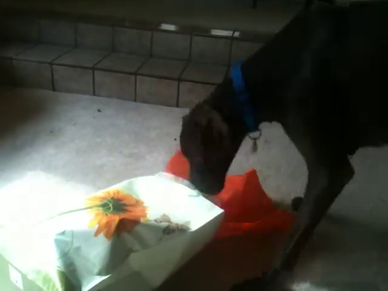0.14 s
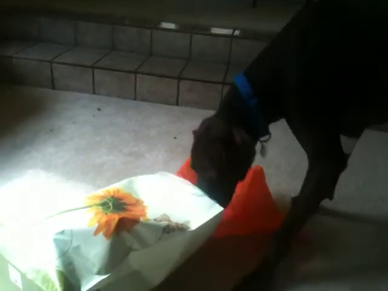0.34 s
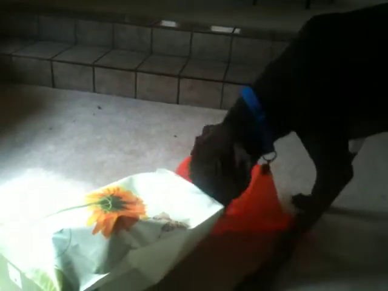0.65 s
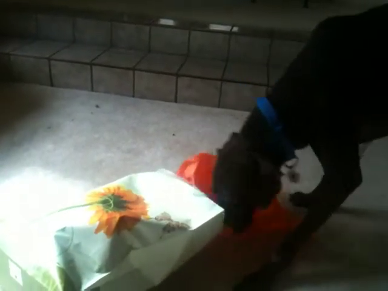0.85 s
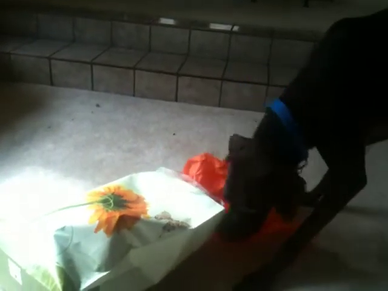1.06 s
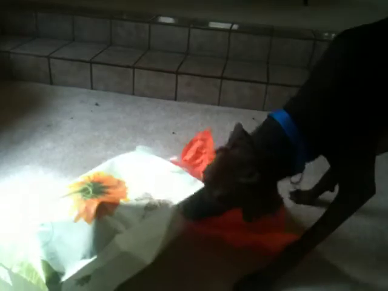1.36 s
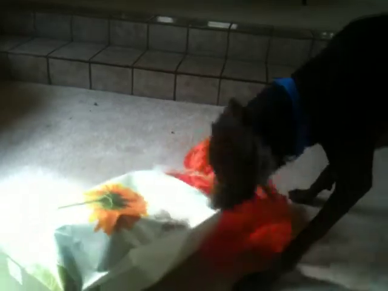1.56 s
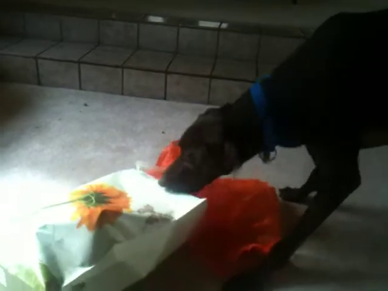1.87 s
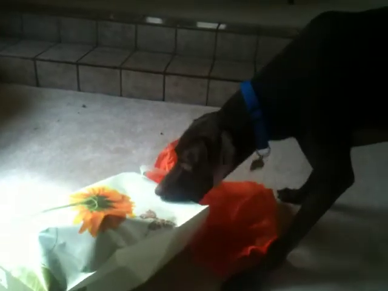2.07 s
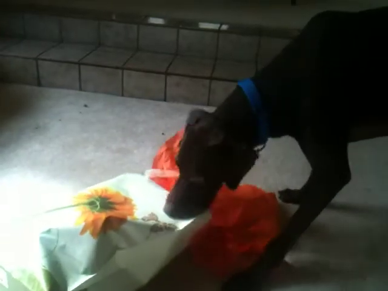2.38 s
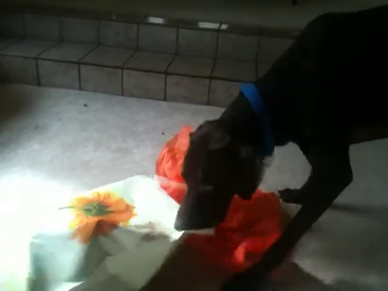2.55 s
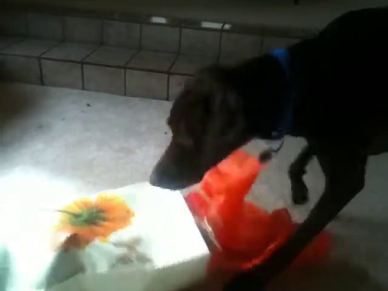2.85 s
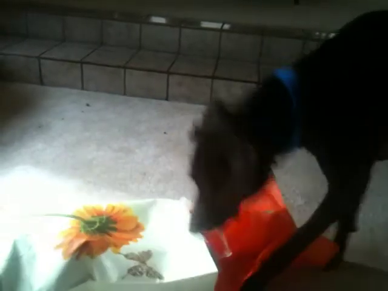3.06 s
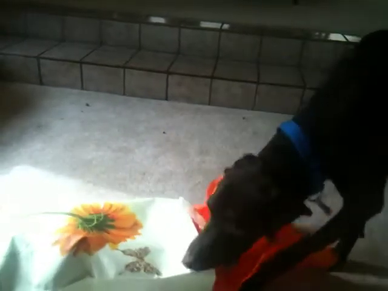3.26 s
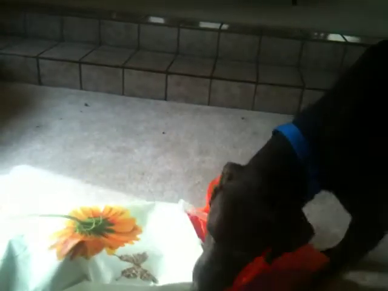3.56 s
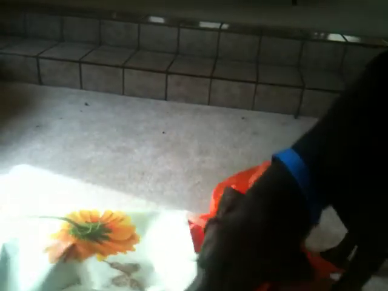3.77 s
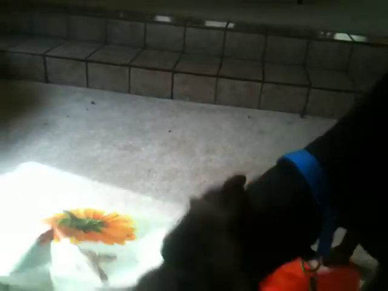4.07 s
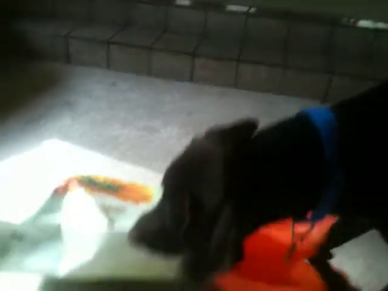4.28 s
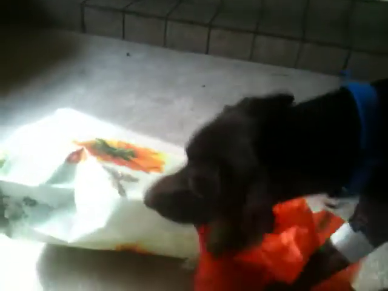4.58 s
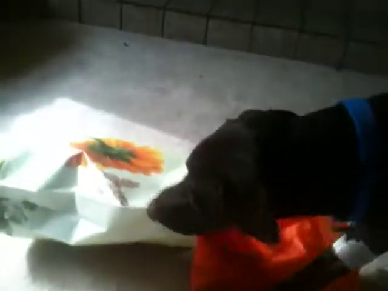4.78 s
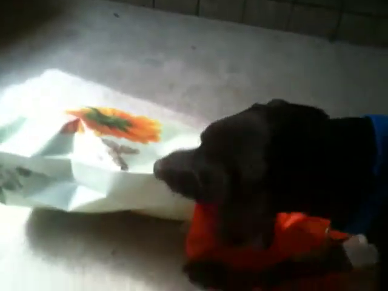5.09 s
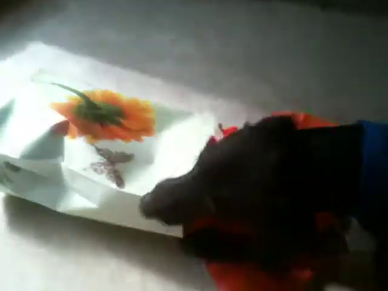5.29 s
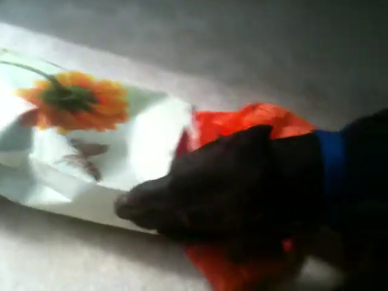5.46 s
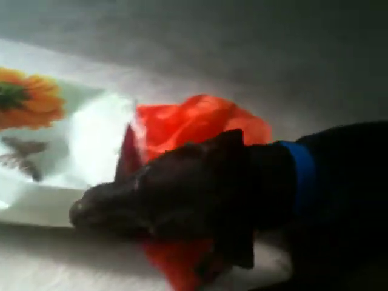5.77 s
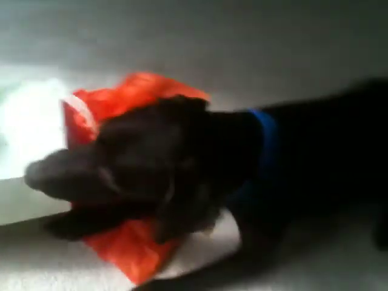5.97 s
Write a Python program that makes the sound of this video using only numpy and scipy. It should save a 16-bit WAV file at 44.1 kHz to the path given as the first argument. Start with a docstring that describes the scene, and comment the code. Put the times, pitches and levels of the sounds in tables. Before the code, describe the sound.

Tissue paper rustles lightly from the start as a dog noses into a stiff paper bag, with one small collar tag clink at 0.3 seconds. Dry, bright crinkles gather from 0.7 seconds, and the bag pops and thumps softly between 1.3 and 1.6 seconds. In a brief lull around 2 seconds, the metal tag clinks a few times. Scraping and rustling swell into a loud snap with a hollow thump at 2.8 seconds. Faint tag ticks follow, then a small hollow knock at 3.4 seconds. The busiest stretch runs from about 4.1 to 4.9 seconds, with sharp bag snaps, low bumps and dense crunching of tissue. Lighter crackling and scraping continue, with another sharp snap near 5.9 seconds. Everything sounds fairly close, in a small room with short reverberation and a faint steady hiss.

```python
"""On the hard floor of a small room, a dog noses into a stiff paper bag stuffed with tissue paper.
The bag's panels buckle with sharp snaps, scrape by stick-slip friction and flex, driving the air
inside as a cavity resonator. The tissue crinkles in swarms of tiny impulses, one for each crease.
Now and then the collar tag strikes its ring and vibrates in its natural modes.
The room adds early reflections and a short reverberation, over a faint steady hiss."""
import sys
import numpy as np
from scipy import signal
from scipy.fft import rfft, irfft, next_fast_len
from scipy.io import wavfile
from scipy.ndimage import map_coordinates

SR = 44100
rng = np.random.default_rng(int(sys.argv[2]) if len(sys.argv) > 2 else 0)


def master_out(mix):
    """Clip the mix to full scale and print it as 16-bit PCM to the path in sys.argv[1]."""
    frames = np.transpose(np.atleast_2d(mix))
    ceiling = np.clip(frames, -1, 1)
    pcm = np.round(ceiling * 32767).astype(np.int16)
    wavfile.write(sys.argv[1], SR, pcm)


N = 270333

FOLD_SLIP_S = 0.016  # decay time of the slip in a small fold
# Panels buckling. Each row: start in seconds, relative level in dB, panel pitch in Hz,
# relative crack level in dB, 60 dB decay time of the slip in seconds.
SNAPS = [(1.3004, -25, 1300, -20, 0.008), (1.3024, -33.5, 2580, -9.5, 0.011),
         (1.357, -46, 2400, -14, 0.032), (1.37, -39.5, 1510, -21, 0.0085), (1.4385, -40, 2350, -5.5, 0.014),
         (1.492, -43.5, 1050, -18, 0.037), (1.511, -34.5, 1210, -28, .011), (1.5798, -37, 1200, -26, 0.015),
         (1.632, -43.5, 2230, -3.5, 0.013), (2.358, -44, 1240, -9, 0.015), (2.544, -39, 1400, -18, 0.05),
         (2.564, -38.5, 1214, -16, 0.028), (2.602, -42.5, 1460, -6, 0.022), (2.733, -38.5, 1700, -6, 0.022),
         (2.7524, -37.5, 1500, 2.5, .004), (2.801, -39, 1150, 2, 0.023), (2.8323, -17.5, 1540, -1, 0.0092),
         (2.842, -28, 1920, -5, 0.028), (2.8479, -24, 2110, -11, 0.0093), (2.86, -31.5, 1290, -23, 0.024),
         (2.877, -38, 2050, -5, 0.039), (2.923, -38.5, 1330, -20, 0.015), (2.937, -39.5, 1200, -27, 0.025),
         (2.994, -48, 1510, -12, 0.019), (3.072, -44, 1400, -19, 0.02), (3.195, -50, 1280, -10, .016),
         (3.207, -48.5, 850, -9, 0.03), (3.6506, -31, 1560, -11.5, 0.0091),
         (3.652, -36.5, 2500, -10, 0.008), (3.682, -40.5, 2330, -4, 0.0091), (3.854, -41, 1540, -12, 0.034),
         (3.873, -33, 1500, -15.5, 0.031), (3.8957, -30.5, 1820, -12.5, 0.012),
         (3.9751, -37.5, 1620, -18, .012), (4.033, -36.5, 1390, 0.5, 0.0077),
         (4.1045, -26.5, 2200, -4, .012), (4.106, -35, 1100, -16, .01), (4.1194, -26, 1630, -9.5, 0.01),
         (4.1272, -29, 2050, -16, 0.014), (4.147, -36, 1260, -10, 0.013), (4.272, -39, 1120, -19, 0.02),
         (4.4146, -19.5, 1720, -8, 0.011), (4.416, -22.5, 2520, -13, 0.009),
         (4.485, -26.5, 2300, -13, 0.011), (4.4877, -24.5, 1330, -12, 0.011),
         (4.4885, -23.5, 2300, -12.5, 0.012), (4.493, -30, 2150, -14, 0.018),
         (4.4965, -29.5, 790, -16, 0.023), (4.757, -39.5, 1890, -4, 0.025), (5.074, -51.5, 1410, 3.5, 0.01),
         (5.182, -40.5, 1270, -22, 0.011), (5.234, -44.5, 1480, -6, 0.02), (5.311, -39, 1420, -13, 0.023),
         (5.325, -35, 1540, -21, 0.019), (5.345, -36.5, 1400, -20, 0.022), (5.353, -42, 1560, 0, 0.0091),
         (5.413, -36, 1330, -36, 0.015), (5.4828, -31, 2360, -6.5, 0.012), (5.509, -37, 1460, -22, 0.032),
         (5.627, -49, 2090, -8, 0.039), (5.651, -44.5, 1146, -18, 0.014),
         (5.794, -34.5, 1400, -15.5, 0.005), (5.8497, -23.5, 1980, -3, 0.0074),
         (5.8509, -31.5, 1490, -16, 0.01), (5.854, -42, 2010, 9, 0.0051), (5.863, -46, 1700, -11, 0.012),
         (6.033, -43, 1470, -8, .028), (6.055, -48, 1200, -17, 0.019)]
def buckles():
    """Elastic instability: each snap settles with a weaker, lower pop, and small folds yield at random."""
    delays = 0.005 * (.5 + rng.random(len(SNAPS)))
    settling = [(s + delay, db - 12.5, hz * 0.541, *crack)
                for (s, db, hz, *crack), delay in zip(SNAPS, delays)]
    folds = [(s, db, hz, -5, FOLD_SLIP_S) for s, db, hz in chance(9, PUSH, over_db=8, hz=1400)]
    return [*SNAPS, *settling, *folds]


# Panel resonances. Each row: frequency in Hz, bandwidth in Hz, gain in dB.
PANEL_MODES = [(810, 52, 0), (1170, 380, 9.5), (1700, 420, -1), (2420, 360, 9), (2480, 410, 1)]
def panel_ring(t, hz, crack_db, slip_s, edge_hz=2900):
    """Modal response: a pop excites nearby panel modes, the fold's own pitch and one overtone."""
    # the bag changes shape, so its panels are never tuned quite alike
    detune = np.exp(.035 * rng.standard_normal(len(PANEL_MODES)))
    modes = [(f * shift, width, gain - 9 * abs(np.log2(f / hz)))
             for (f, width, gain), shift in zip(PANEL_MODES, detune)]
    # a broad panel radiates little treble; a soft buckle is duller still and loses its overtone
    soft_db = max(-11.5 - crack_db, 0)
    fold_modes = [(hz, .19 * hz, 12), (1.504 * hz, .19 * hz, 4.5 - 3 * soft_db)]
    treble_cut = signal.butter(4, edge_hz * 2 ** (-soft_db / 26), fs=SR, output="sos")
    pop = (t == 0) + 0.26 * np.clip(t / 0.0015, 0, 1) * burst(t, slip_s)
    ringing = resonate(pop, modes) * amp(3.5) + resonate(pop, fold_modes) * amp(4.0)
    return fix_energy(signal.sosfilt(treble_cut, ringing))


# Spectrum of a crack. Each row: frequency in Hz, gain in dB.
CRACK_SPECTRUM = [(80, -14), (500, -21), (800, -17), (2200, -20), (2900, 3), (3500, -2), (4200, 5.5),
                  (5300, 4.5), (6300, 2), (8200, -3), (10000, -16), (12000, -19.5), (15800, -46)]
def snaps(rise_s=0.00072, usual_db=-41, thump_hz=330):
    """Snap-through buckling: a fold releases its strain as a crack, a panel ring and a thump of air."""
    out, t = np.zeros(N), np.arange(SR // 8) / SR
    for s, db, hz, crack_db, slip_s in buckles():
        panel = amp(-8.5) * panel_ring(t, hz, crack_db, slip_s)
        flutter = burst(t, slip_s) + 0.049 * burst(t, 0.043)
        skid = 1.4 * (t == 0) + (1 - np.exp(-t / rise_s)) * flutter
        skid = coloured(skid, [(6000, 0), (12000, db + crack_db + 26.5)])  # harder is brighter
        crack = amp(crack_db - 7.5) * fix_energy(coloured(skid, CRACK_SPECTRUM))
        # harder snaps go more into the panel and less into the air
        thump_db = -13.5 - 0.23 * max(db - usual_db, 0)
        thump = (slip_s / FOLD_SLIP_S) ** 0.44 * amp(thump_db) * bump(thump_hz, ring_db=-2.0)
        add(out, s, amp(db + 3.5) * (panel + crack + thump))
    return out


# The muzzle's push on the bag. Each row: time in seconds, relative level in dB.
PUSH = [(0, -60.5), (.5, -63.5), (1.1, -62), (1.35, -56), (1.6, -58.5), (1.76, -74), (1.85, -65.5),
        (2.329, -73.5), (2.48, -60), (2.56, -54.5), (2.82, -48.5), (3.15, -63), (3.42, -70.5),
        (3.52, -62.5), (3.7, -59), (4.15, -52.5), (4.62, -52.5), (5.001, -60.5), (5.38, -54.5),
        (5.63, -62.5), (5.92, -53.5), (6.08, -62)]
# Spectrum of scraping paper. Each row: frequency in Hz, gain in dB.
SCRAPE_SPECTRUM = [(70, -36), (250, -8), (550, 3), (900, 2.5), (1400, 4.5), (1900, 2), (2250, 1.5),
                   (3000, -10), (4500, 5), (9000, -14.5)]
def scraping():
    """Stick-slip friction: small slips excite three paper resonances, louder as the muzzle pushes."""
    modes = [(1070, 240, 0), (1540, 1100, 0.012), (2400, 1000, 0)]
    slips = sum(resonate(crinkles(per_s=260, spread_db=4.5, t60=0.028), [mode]) for mode in modes)
    friction = unit_rms(slips) + rng.standard_normal(N)
    return amp(-2.5) * envelope(PUSH) * unit_rms(coloured(friction, SCRAPE_SPECTRUM))


def flexing(usual_push_db=-59.5, deeper_db_per_s=0.5):
    """Forced vibration: the walls follow the push, and boom more as the muzzle works deeper."""
    drive = crinkles(per_s=120, spread_db=3, t60=0.038) + amp(-7.0) * rng.standard_normal(N)
    depth_db = deeper_db_per_s * np.arange(N) / SR
    push = (envelope(PUSH) / amp(usual_push_db)) ** 0.95
    return amp(-70 + depth_db) * push * unit_rms(hollow(drive))


# Low thumps of the bag, some alone and some under its loud snaps.
# Each row: start in seconds, relative level in dB, pitch in Hz.
LOW_THUMPS = [(0.093, -47, 231), (.926, -47.5, 320), (1.207, -40, 214), (1.302, -37.5, 350),
              (1.359, -40.5, 196), (1.511, -42, 330), (1.581, -38, 362), (1.648, -46.5, 330),
              (1.726, -50, 270), (1.845, -49, 345), (1.87, -51, 260), (1.978, -48, 283), (2.365, -40, 262),
              (2.565, -43, 300), (2.735, -42, 250), (2.767, -44, 200), (2.81, -35, 257),
              (2.827, -27.5, 248), (3.5, -43.5, 169), (3.596, -44, 163), (3.893, -45, 250),
              (3.977, -40, 232), (4.104, -36.5, 300), (4.128, -35, 330), (4.181, -42, 250),
              (4.415, -37.5, 330), (4.485, -31.5, 199), (4.763, -51, 220), (4.787, -51, 250),
              (4.894, -45.5, 298), (5.041, -52, 277), (5.181, -46, 260), (5.207, -41, 270),
              (5.308, -39.5, 262), (5.489, -36.5, 290), (5.761, -48, 280), (5.812, -44.5, 300),
              (5.852, -48, 320), (6.031, -37, 318)]
def low_thumps():
    """Damped resonance: the hollow bag thumps at a low pitch, with a brief rub of paper."""
    out, t = np.zeros(N), np.arange(SR // 8) / SR
    for s, db, hz in LOW_THUMPS:
        rub = resonate(burst(t, 0.11), [(915, 470, 0)])
        add(out, s, amp(db - 3.0) * (bump(hz, ring_db=-2.5) + amp(-9.5) * fix_energy(rub)))
    return out


def bump(hz, ring_db):
    """Piston radiation: a wall gives with one low push, and the cavity answers."""
    t = np.arange(SR // 8) / SR
    band = signal.butter(3, [120, 700], "band", fs=SR, output="sos")
    shove = signal.sosfilt(band, (t == 0) + 0.059 * burst(t, 0.046))
    wall = fix_energy(resonate(shove, [(hz, 0.59 * hz, 0)]))
    cavity = fix_energy(hollow(burst(t, 0.048)))
    return fix_energy(wall + amp(ring_db) * cavity)


# Resonances of the enclosed air and whole walls. Each row: frequency in Hz, bandwidth in Hz, gain in dB.
HOLLOW_MODES = [(144, 120, -9.5), (221.6, 109, -1.5), (270, 92, 1.5), (366, 195, -1), (480, 157, -4.5)]
def hollow(x, low_hz=125):
    """Cavity resonance: the bag booms, but is too small to radiate deep bass."""
    band = signal.butter(3, [low_hz, 800], "band", fs=SR, output="sos")
    return signal.sosfilt(band, resonate(x, HOLLOW_MODES))


# Tone colour of the rustle as heard through the microphone. Each row: frequency in Hz, gain in dB.
RUSTLE_COLOUR = [(600, -33), (1500, 0.5), (2350, -0.5), (3400, -5.5), (4200, -4.5), (5000, -3), (6300, -1),
                 (8200, -3), (9800, -12), (10700, -14.5), (12200, -14.5), (15800, -23)]
def tissue_grain(fits_per_s=70, fits_db=1.6):
    """Crackling noise: folds of three sizes give way, each in its own register, in fits and starts."""
    registers = [(2520, 16000, 0.012), (5300, 5400, 0), (9000, 28000, 0.023)]
    swarms = sum(resonate(crinkles(per_s=620, spread_db=4.2, t60=.005), [mode]) for mode in registers)
    sliding = amp(-10) * rng.standard_normal(N)
    knots = rng.standard_normal(int(N * fits_per_s / SR) + 4)
    fits = map_coordinates(knots, [np.arange(N) * fits_per_s / SR])
    return coloured(amp(fits_db * fits) * (unit_rms(swarms) + sliding), RUSTLE_COLOUR)


# Stirring of the tissue. Each row: time in seconds, relative level in dB.
STIR = [(0, -59.5), (.17, -57.5), (.52, -65.5), (1.05, -61), (1.55, -64.5), (1.77, -71.5), (1.815, -64.5),
        (2.48, -65.5), (2.6, -56), (2.82, -56), (3.05, -60.5), (3.44, -69.5), (3.64, -66), (3.93, -58.5),
        (4.3, -59), (4.5, -49.5), (5.05, -60.5), (5.22, -61.5), (5.36, -56), (5.52, -64), (6.13, -65)]
def stirring():
    """Superposition: countless tiny slips merge into a rustle that swells as the tissue moves."""
    return amp(-0.5) * envelope(STIR) * unit_rms(tissue_grain())


# Crushed wads. Each row: start in seconds, level in dB, time before the decay in seconds,
# treble gain in dB.
CRUSHES = [(0.585, -61.5, .03, -8), (0.735, -54, 0.038, 2), (0.87, -58, .16, 3), (1.138, -59, .19, 0),
           (1.446, -62, .12, 3), (2.22, -63, 0.045, 19), (2.564, -60, 0.18, 6), (3.494, -57, 0.04, 0),
           (3.723, -59.5, .06, -6), (4.327, -49, 0.19, -2.5), (4.548, -44.5, 0.11, -0.5),
           (4.77, -52, 0.11, -2.5), (5.874, -57, 0.11, -7), (5.988, -63, 0.04, 9)]
def crushes():
    """Avalanche: a squeezed wad lets go many creases at once and quickly falls still."""
    out, grain = np.zeros(N), tissue_grain()
    for s, db, hold_s, treble_db in CRUSHES:
        wad = coloured(grain[round(s * SR):][:SR // 6], [(1500, 0.63), (4500, 0.21), (12000, treble_db)])
        t = np.arange(len(wad)) / SR
        squeeze = np.clip(t / 0.0053, 0, 1) * amp(-60 * np.maximum(t - hold_s, 0) / 0.075)
        add(out, s, amp(db) * squeeze * unit_rms(wad))
    return out


# The sharpest tissue creases. Each row: start in seconds, relative level in dB, pitch in Hz.
CREASES = [(0.015, -50, 3980), (.109, -49, 6000), (0.179, -44, 6500), (.554, -52, 6000), (.742, -50, 7000),
           (.748, -47, 7000), (0.7626, -47, 7000), (0.8, -44, 6200), (.856, -45, 7000), (.865, -49, 6500),
           (0.879, -45, 7500), (0.8987, -49, 7500), (.948, -43.5, 6500), (.999, -47, 6500),
           (1.0086, -39, 7000), (1.068, -50, 4200), (1.121, -42, 6200), (1.144, -47, 7500),
           (1.155, -48, 7000), (1.1672, -37.5, 3600), (1.178, -46, 6500), (1.198, -45, 7500),
           (1.239, -42, 5500), (1.243, -47, 8000), (1.262, -43, 4500), (1.272, -47, 6000),
           (1.72, -52, 4000), (2.018, -46.5, 3500), (2.082, -45.5, 5200), (2.189, -66, 5000),
           (2.529, -47, 6000), (2.71, -41, 6000), (2.764, -40, 6500), (2.986, -50, 6500),
           (2.995, -48, 6500), (3.015, -41.5, 8000), (3.088, -49, 8100), (3.182, -50, 6500),
           (3.709, -51, 6300), (4.366, -38, 5500), (4.567, -39, 4500), (4.587, -36, 5000),
           (4.626, -38, 3980), (4.656, -37, 4200), (4.7963, -43, 6200), (4.842, -38, 5500),
           (4.862, -44, 6000), (4.977, -52, 6000), (5.596, -52, 6000), (5.716, -53, 7000),
           (5.96, -46, 6500)]
def creases():
    """Heavy damping: each larger crease gives one dry tick; lesser ones yield at random."""
    out, t = np.zeros(N), np.arange(SR // 25) / SR
    for s, db, hz in CREASES + chance(5.5, STIR, over_db=9, hz=6200):
        tick = coloured(burst(t, t60=0.016), RUSTLE_COLOUR)
        add(out, s, amp(db - 6.0) * fix_energy(resonate(tick, [(hz, 2 * hz, 0)])))
    return out


# Modes of the tag and ring. Each row: frequency in Hz, gain in dB, 60 dB decay time in seconds.
TAG_MODES = [(2740, 4.5, 0.045), (4695, -1, 0.043), (5450, 1, 0.054), (6220, 5, .045), (6640, -1, .04),
             (7300, -2, .05), (7500, -8, .035), (7900, -4, .05), (8400, 0, .04), (8600, 0, .1),
             (11650, -6, .07), (12200, -5, .04), (12870, -7, .06), (14900, 1, .022)]
# The tag striking its ring. Each row: start in seconds, relative level in dB, favoured pitch in Hz,
# gain of the ringing in dB.
CLINKS = [(0.3, -41, 3650, -0.5), (1.893, -41, 6200, -13), (1.935, -35.5, 6200, -16),
          (1.941, -24, 7150, -23), (1.9425, -43, 14000, -7), (1.947, -42, 5500, -9),
          (1.954, -46, 8400, -12), (2.111, -44, 7500, -11), (2.1204, -37.5, 6770, -13.5),
          (2.122, -49, 11300, -7), (2.13, -42, 8400, -11), (3.131, -47, 6200, -7), (3.133, -52, 12200, -9),
          (3.138, -49, 14800, -8), (3.229, -49, 9600, -3.5)]
def tag_clinks(chatter_s=0.0019):
    """Free vibration: metal rings after a double contact; damped by the dog's coat it only ticks."""
    out, t = np.zeros(N), np.arange(SR // 4) / SR
    for s, db, hz, ring_db in CLINKS:
        strike_db = rng.normal(0, 2.5, len(TAG_MODES))
        # still jostling on its ring, the tag never holds a pure tone
        jostle = np.cumsum(rng.normal(0, .07, (len(TAG_MODES), len(t))), axis=1)
        ring = np.zeros(len(t))
        for (f, gain, t60), strike, drift in zip(TAG_MODES, strike_db, jostle):
            mode_db = gain + strike - 31 * abs(np.log2(f / hz))
            ring += amp(mode_db - 60 * t / t60) * np.cos(2 * np.pi * f * t + drift)
        touch = (t == 0) + 0.29 * burst(t, 0.03)
        add(touch, chatter_s, np.array([-0.7]))
        contact = resonate(resonate(touch, [(hz, 0.3 * hz, 0)]), [(hz, 0.73 * hz, 0)])
        add(out, s, amp(db + ring_db) * fix_energy(ring) + amp(db - 14.5) * fix_energy(contact))
    return out


def tag_slide(start_s=1.81, length_s=0.14, hz=6200, width_hz=240):
    """Frictional excitation: sliding on its ring, the tag swells and fades on one mode."""
    out, t = np.zeros(N), np.arange(SR // 4) / SR
    swell = np.sqrt(np.abs(np.sin(np.pi * np.minimum(t / length_s, 1))))
    song = resonate(rng.standard_normal(len(t)), [(hz, width_hz, 0)])
    add(out, start_s, amp(-65.5) * swell * unit_rms(song))
    return out


# Modes of something hollow in the bag. Each row: frequency in Hz, gain in dB, 60 dB decay time in seconds.
KNOCK_MODES = [(734, -7, 0.17), (1200, 11, 0.018), (1330, -18, 0.014)]
def knock(start_s=3.4345):
    """Impulse response: bumped once by the muzzle, a hollow object rings as damped sinusoids."""
    out, t = np.zeros(N), np.arange(SR // 6) / SR
    ring = sum(amp(db - 60 * t / t60) * np.cos(2 * np.pi * hz * t) for hz, db, t60 in KNOCK_MODES)
    attack = np.clip(t / 0.0015, 0, 1)
    add(out, start_s, amp(-44.5) * fix_energy(ring * attack))
    return out


# Narrow resonances of the bag's air. Each row: frequency in Hz, bandwidth in Hz, relative gain in dB.
AIR_MODES = [(202, 8.1, -12), (270, 13, -1), (705, 37, -7), (770, 110, 7), (1780, 110, -30), (2360, 210, 9)]
def bag_air(paper):
    """Sympathetic resonance: the air in the bag rings on after the paper has moved."""
    return amp(-21.5) * sum(resonate(paper, [mode]) for mode in AIR_MODES)


# The room's decay. Each row: frequency in Hz, reverberation time in seconds.
ROOM_DECAY = [(150, 0.52), (1500, 0.17), (5000, 0.27), (14000, 0.18)]
def room(x, wet_db, early_db):
    """Reverberation: nearby hard surfaces reflect within milliseconds, then a diffuse tail decays."""
    out, block = np.zeros(N), SR // 4
    for start in range(0, N, block):  # new random paths for each block, as the dog moves
        hz, t, spectra = signal.stft(rng.standard_normal(SR // 2), SR, nperseg=256)
        decay = amp(-60 * t / log_interp(ROOM_DECAY, hz)[:, None])
        tail = signal.istft(spectra * decay, SR, nperseg=256)[1]
        t = np.arange(len(tail)) / SR
        tail = tail * np.clip(t / 0.0089, 0, 1)
        early = burst(t, 0.11) * (rng.random(len(t)) < .05) * (t > .002)
        response = amp(wet_db) * tail / np.linalg.norm(tail) + amp(early_db) * early / np.linalg.norm(early)
        add(out, start / SR, signal.fftconvolve(x[start:start + block], response))
    return out


# Spectrum of the background. Each row: frequency in Hz, gain in dB.
HISS_SPECTRUM = [(30, -39), (80, -10.5), (150, -3), (300, 3.5), (600, -5), (1200, -6), (2300, -12),
                 (3400, -19), (6300, -34), (11000, -15.5), (15500, -17.5)]
def hiss():
    """Stationary noise: a faint, steady floor under everything."""
    return amp(-70.5) * unit_rms(coloured(rng.standard_normal(N), HISS_SPECTRUM))


def crinkles(per_s, spread_db, t60):
    """Shot noise: slips of random time and size, each with one of 24 brief flutters."""
    size = amp(spread_db * np.minimum(rng.exponential(size=N), 3))
    slips = size * rng.choice([-1, 1], N) * (rng.random(N) < per_s / SR)
    t = np.arange(SR // 50) / SR
    flutter = rng.integers(0, 24, N)
    return unit_rms(sum(signal.oaconvolve(slips * (flutter == k), fix_energy(burst(t, t60)))[:N]
                        for k in np.unique(flutter)))


def chance(per_s, curve, over_db, hz, scatter_db=3, scatter_octaves=0.095):
    """Poisson process: (seconds, dB, Hz) events whose strength follows a level curve."""
    draws = rng.random((200, 3))
    times = np.cumsum(-np.log(1 - draws[:, 0])) / per_s
    db = np.interp(times, *np.transpose(curve)) + over_db + scatter_db * (2 * draws[:, 1] - 1)
    pitch = hz * 2 ** (scatter_octaves * (2 * draws[:, 2] - 1))
    return [event for event in zip(times, db, pitch) if event[0] < N / SR]


def burst(t, t60):
    """Exponential decay: white noise that falls 60 dB in t60 seconds."""
    return rng.standard_normal(len(t)) * amp(-60 * t / t60)


def resonate(x, modes):
    """Modal sum: x drives (Hz, bandwidth in Hz, dB) resonators of alternating sign."""
    size = next_fast_len(len(x) + 4096)
    f = np.fft.rfftfreq(size, 1 / SR)
    response = sum((-1) ** k * amp(db) * 1j * f * width / (hz * hz - f * f + 1j * f * width)
                   for k, (hz, width, db) in enumerate(modes))
    return irfft(rfft(x, size) * response, size)[:len(x)]


def coloured(x, spectrum):
    """Minimum-phase filtering: x is shaped causally by a (Hz, dB) spectrum."""
    size = 2 * next_fast_len(len(x) // 2 + 1024)
    cepstrum = irfft(np.log(amp(log_interp(spectrum, np.fft.rfftfreq(size, 1 / SR)))))
    cepstrum[1:size // 2] *= 2
    cepstrum[size // 2 + 1:] = 0
    return irfft(rfft(x, size) * np.exp(rfft(cepstrum)))[:len(x)]


def log_interp(points, hz):
    """Interpolation of (Hz, value) points on a logarithmic frequency axis."""
    f, values = np.transpose(points)
    return np.interp(np.log(hz + 1), np.log(f + 1), values)


def envelope(curve):
    """Amplitude envelope: a (seconds, dB) curve as one gain per sample."""
    return amp(np.interp(np.arange(N) / SR, *np.transpose(curve)))


def amp(db):
    """Decibels as an amplitude ratio."""
    return 10 ** (np.asarray(db) / 20)


def unit_rms(x):
    """Power normalisation to rms 1."""
    return x / np.sqrt(np.mean(x ** 2) + 1e-20)


def fix_energy(x):
    """Energy normalisation: a short sound gets the energy of 2 ms at rms 1."""
    return x * np.sqrt(.002 * SR / (np.sum(x ** 2) + 1e-20))


def add(track, s, x):
    """Superposition of x on the track from s seconds."""
    part = track[max(round(s * SR), 0):][:len(x)]
    part += x[:len(part)]


def scene():
    """Linear superposition: direct sound of paper and collar, its reflections and the hiss."""
    paper = scraping() + flexing() + stirring() + crushes() + low_thumps() + snaps() + creases()
    direct = paper + bag_air(paper) + knock() + tag_clinks() + tag_slide()
    return (direct + room(direct, wet_db=-12.5, early_db=-14.0) + hiss())[None]


def record(dry, top_hz=15850):
    """Band limiting: an ideal low-pass filter removes the highest treble."""
    size = next_fast_len(N + 4096)
    passband = np.fft.rfftfreq(size, 1 / SR) < top_hz
    return irfft(rfft(dry, size) * passband, size)[..., :N]


dry = scene()
out = record(dry)
master_out(out)
```